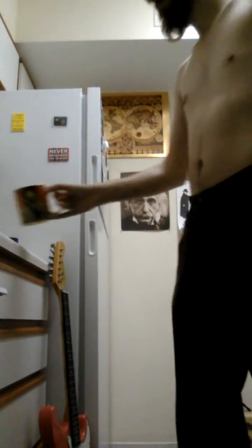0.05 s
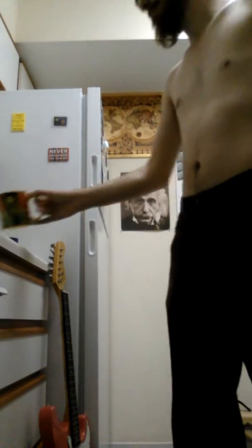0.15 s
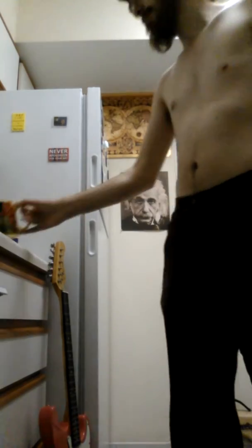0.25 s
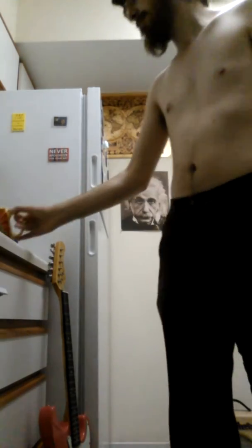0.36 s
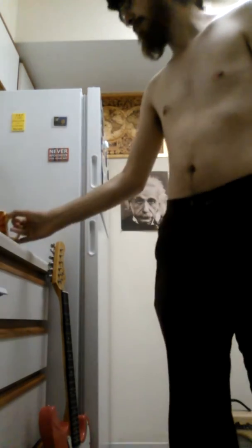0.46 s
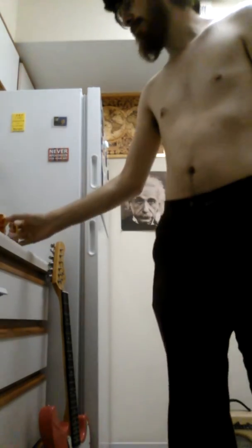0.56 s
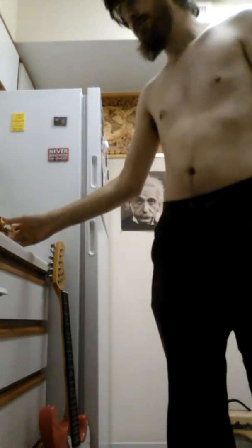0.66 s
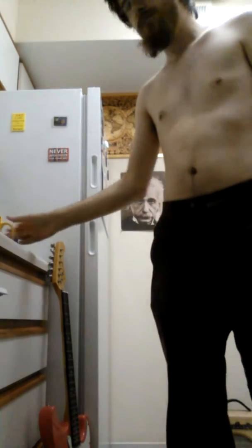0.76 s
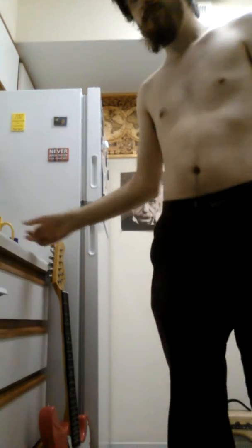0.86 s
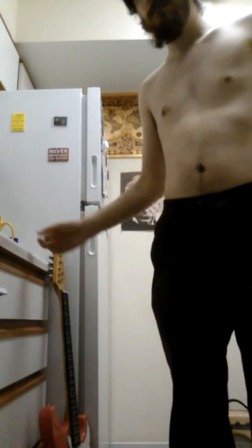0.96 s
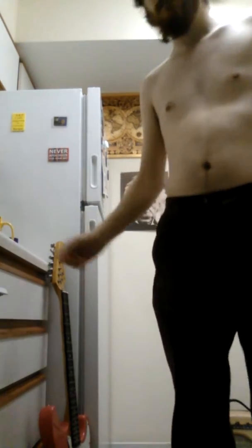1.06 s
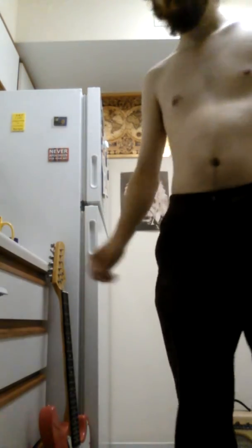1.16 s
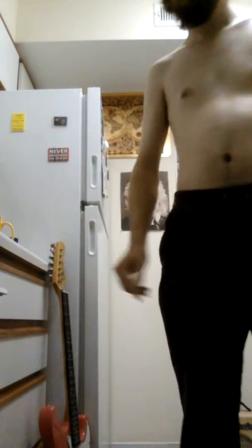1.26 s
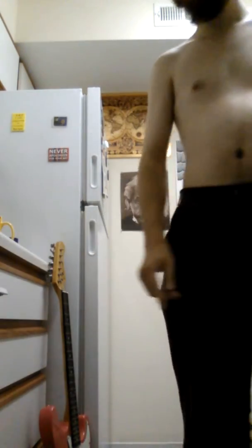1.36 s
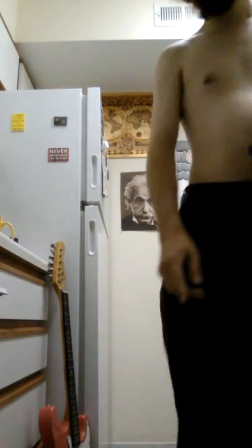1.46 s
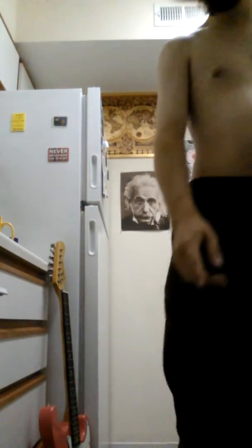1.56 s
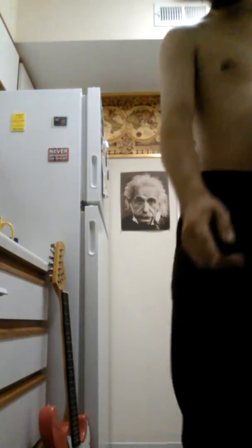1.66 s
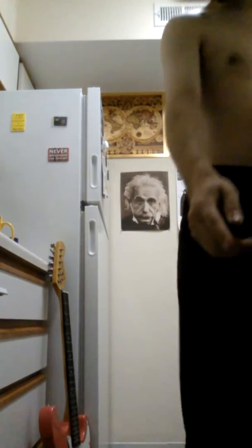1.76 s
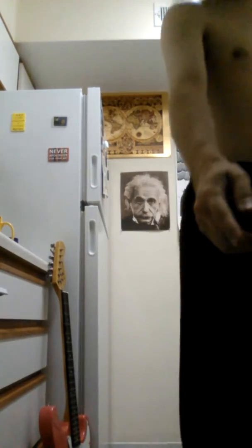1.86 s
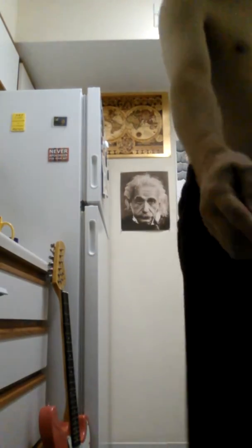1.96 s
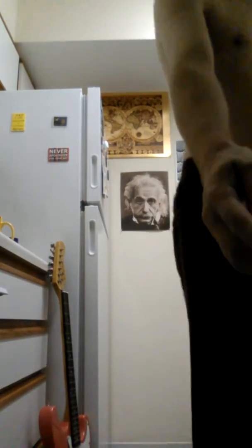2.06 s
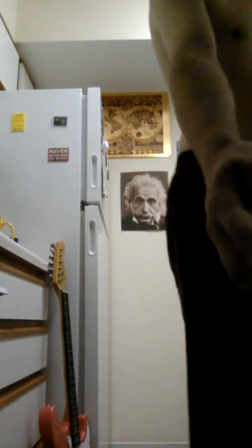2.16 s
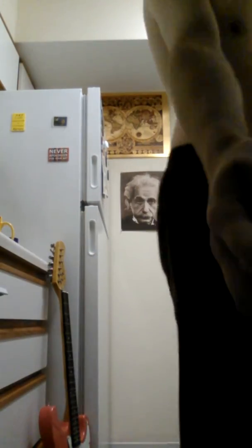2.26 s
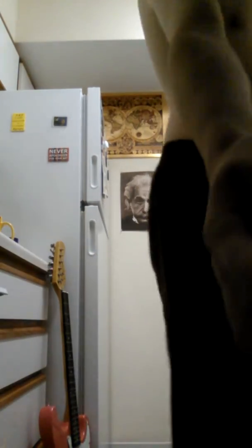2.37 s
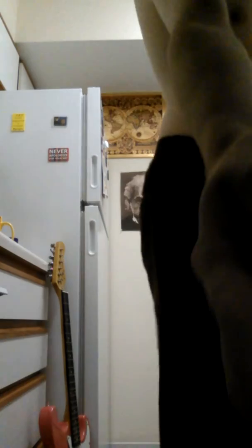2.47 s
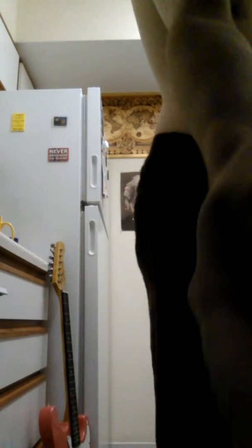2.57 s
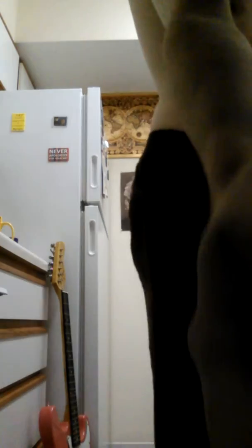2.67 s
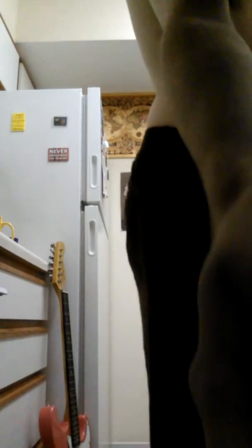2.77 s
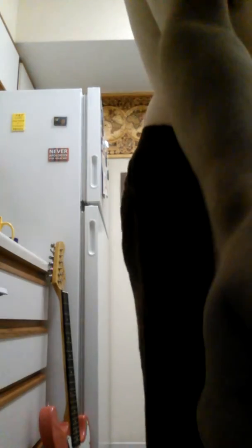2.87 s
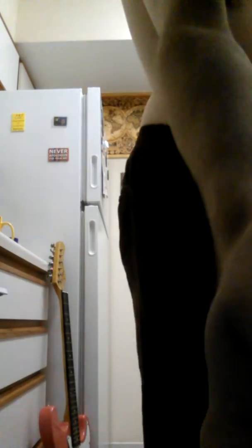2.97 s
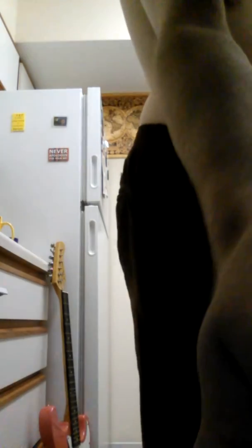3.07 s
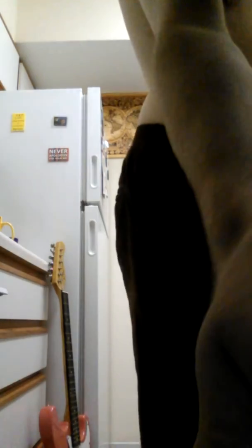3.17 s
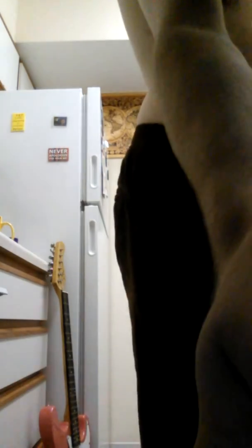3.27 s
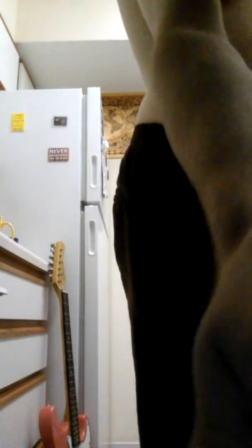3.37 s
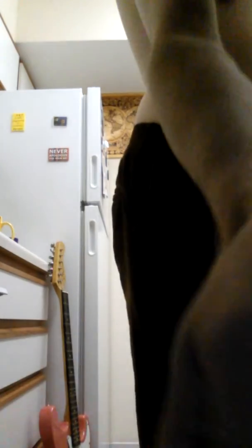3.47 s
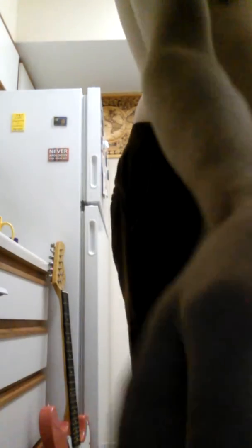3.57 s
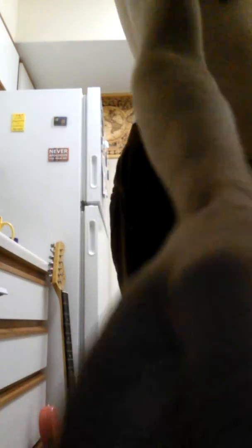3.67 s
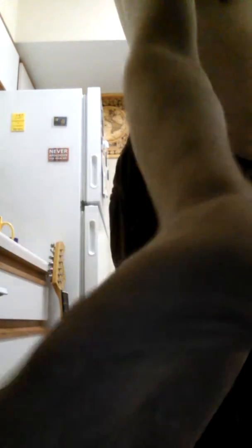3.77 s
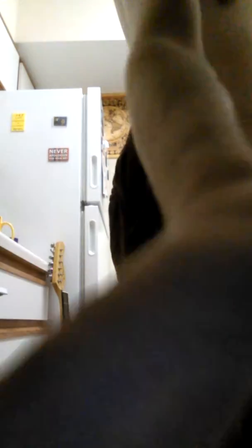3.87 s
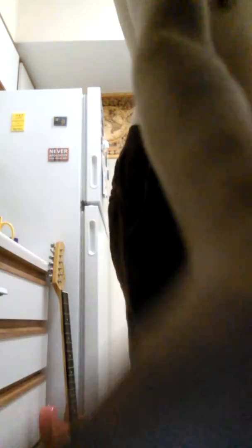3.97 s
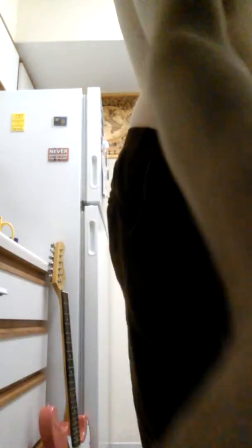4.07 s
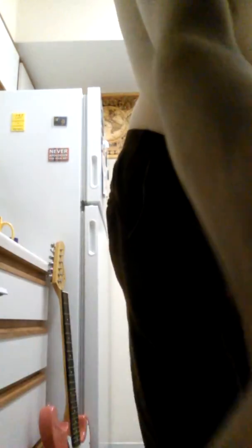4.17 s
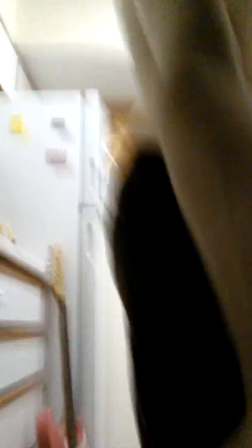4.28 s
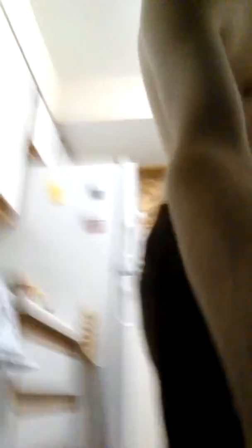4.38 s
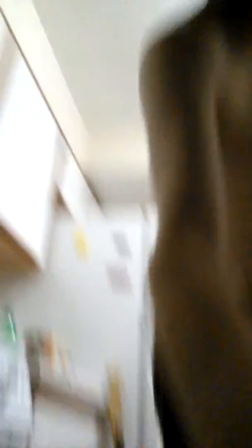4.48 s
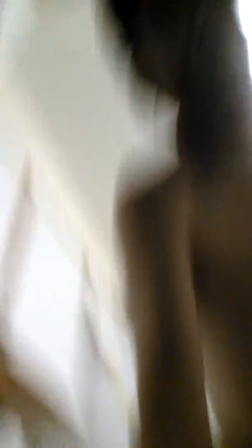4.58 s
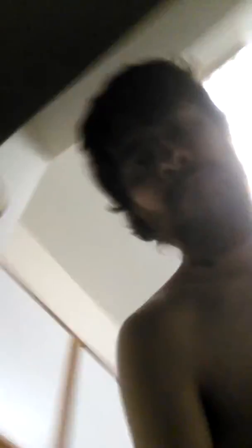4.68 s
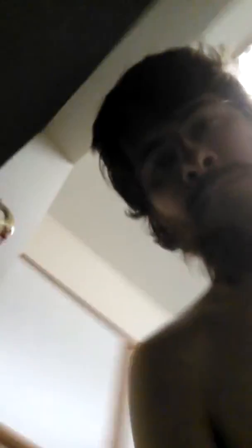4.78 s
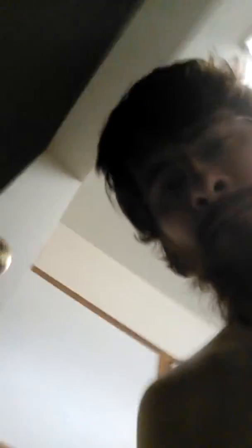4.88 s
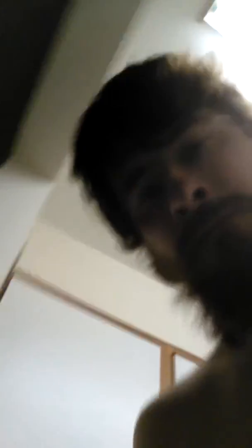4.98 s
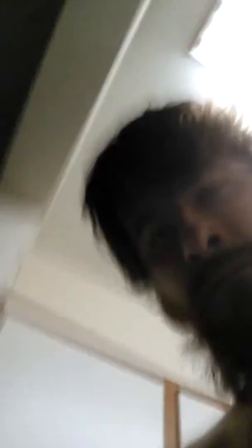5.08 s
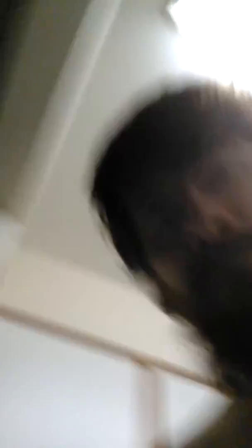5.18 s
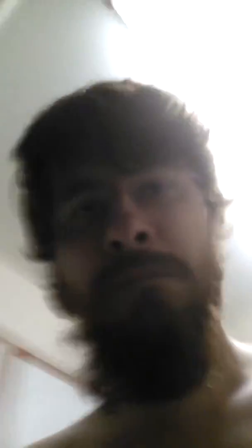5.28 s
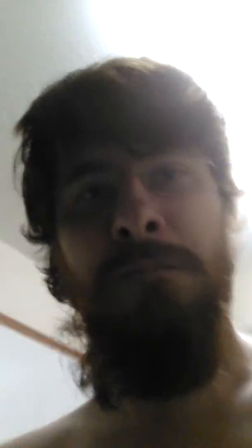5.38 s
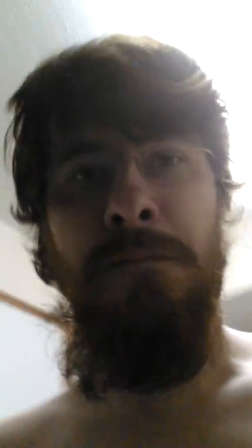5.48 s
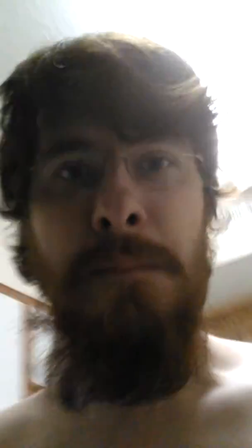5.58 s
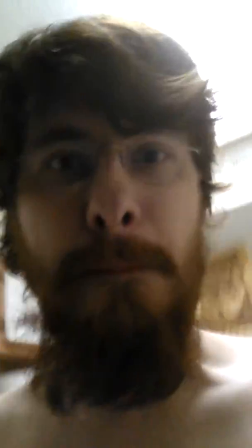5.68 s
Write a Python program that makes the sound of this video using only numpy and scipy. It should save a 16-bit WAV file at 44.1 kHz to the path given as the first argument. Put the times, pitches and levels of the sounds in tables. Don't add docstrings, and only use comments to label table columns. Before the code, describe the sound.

Double thud of a mug landing on a resonant counter, soft barefoot steps, faint fridge hum, then harsh close handling clatter on the phone.

```python
import sys
import numpy as np
from scipy import signal
from scipy.fft import rfft, irfft, next_fast_len
from scipy.io import wavfile
from scipy.ndimage import uniform_filter1d, map_coordinates

SR = 44100
rng = np.random.default_rng(int(sys.argv[2]) if len(sys.argv) > 2 else 0)


def output_pcm(signal):
    pcm = np.clip(np.atleast_2d(signal).T, -1, 1) * 32767
    wavfile.write(sys.argv[1], SR, np.round(pcm).astype(np.int16))


def convert_level_to_amplitude(level_db):
    exponent = np.asarray(level_db, float) / 20
    return 10 ** exponent


N = 253134

# (time [s], level [dB])
AIR_STIR = [(0.0, -56), (0.48, -59.5), (0.64, -50.5), (0.91, -52.5), (1.12, -61), (1.39, -60), (1.66, -55),
            (3.01, -63), (3.56, -58.5), (3.74, -64.5), (4.25, -66.5), (4.38, -65), (4.75, -54.5),
            (4.99, -50.5), (5.37, -65), (5.5, -54.5), (5.62, -57), (5.74, -54)]
# (frequency [Hz], density [dB/Hz])
RUMBLE_SPECTRUM = [(8, -11), (16, 0), (30, -11.5), (43, 2), (62, 0), (75, -23.5), (100, -30.5), (200, -76)]
# (frequency [Hz], density [dB/Hz])
HUM_SPECTRUM = [(47, -55.5), (80, -27.5), (113, -3), (187, -12), (217, -3.5), (278, -7.5), (322, -2.5),
                (361, -9), (500, -12), (845, -15.5), (947, -12.5), (1170, -18), (4000, -34.5),
                (5200, -64.5), (8800, -120)]
# (frequency [Hz], density [dB/Hz])
HISS_SPECTRUM = [(1760, -38.5), (3000, -24.5), (4070, -13.5), (6300, -10.5), (8000, -4.5), (9500, -4.5),
                 (12000, -10.5), (15750, -17), (15950, -50)]
# (frequency [Hz], level [dB], unsteadiness [1/s])
MOTOR_LINES = [(44, -48, 3.415), (103, -73.5, 27), (224, -60, 5), (340, -60, 8.3)]
# (frequency [Hz], level [dB])
WHINE_LINES = [(5152, -16), (8113, -16.5), (8166, -12.5), (8226, -0.5), (8285, -4.5)]
# (time [s], peel [dB], length [s], heel [dB], squeak [dB], brightness [dB/octave])
STEPS = [
    (0.143, -37, 0.021, -42.5, -60, 3),
    (0.967, -32, 0.017, -38, -39.5, -3),
    (1.444, -41.5, 0.031, -41, -67, -2),
    (1.529, -36, 0.036, -58, -71, 1.5),
]
# (frequency [Hz], density [dB/Hz])
PEEL_SPECTRUM = [(710, -54), (1200, -14.5), (1570, -13), (2230, -14), (2650, -8.5), (3180, -17),
                 (5470, -6.5), (8260, -0.5), (11600, -8), (15700, -24), (16000, -55)]
# (time [s], length [s], level [dB])
LIFTS = [
    (4.337, 0.035, -21),
    (4.628, 0.09, -27.5),
    (4.718, 0.07, -24),
    (4.785, 0.045, -27),
    (4.835, .07, -27),
    (4.91, .1, -28),
]
# (time [s], level [dB], t60 [s])
SQUEEZES = [
    (4.302, -5, 0.03),
    (4.343, -13.5, 0.23),
    (5.06, -35, 2.7),
    (5.36, -19, 0.1),
]
# (time [s], length [s], level [dB], frequency [Hz])
CREAKS = [(4.414, 0.026, -30.5, 3960), (4.715, 0.05, -57, 3640), (4.785, 0.025, -44, 3440),
          (4.836, .024, -35, 4900), (4.73, .04, -53, 4500), (4.795, .035, -51, 5500),
          (5.16, .035, -55, 5000), (3.125, .12, -64, 2200), (4.91, .14, -57, 2200),
          (4.855, .028, -48.5, 3860), (5.072, 0.031, -44, 4030), (5.118, 0.045, -40, 4114),
          (5.251, 0.026, -45.5, 4400), (5.226, .02, -52.5, 3500)]
# (time [s], length [s], level [dB], frequency [Hz])
SLIDES = [(4.189, 0.31, -54.5, 8910), (4.352, .02, -41, 8500), (4.368, 0.052, -28.5, 7920),
          (4.415, .033, -42, 6000), (4.445, 0.17, -54, 8900), (5.293, .085, -49, 8600),
          (5.341, 0.052, -36.5, 8370), (5.372, .02, -41, 8500), (5.39, 0.085, -49.5, 6100)]
# (time [s], length [s], level [dB], frequency [Hz])
SQUEAKS = [
    (3.13, 0.14, -59, 5650),
    (3.478, 0.022, -53, 5630),
    (5.415, .0334, -42.5, 6400),
    (5.462, 0.062, -34, 6230),
    (5.51, 0.045, -46.5, 6300),
    (5.638, 0.14, -45.5, 6860),
]
# (time [s], length [s], level [dB], frequency [Hz])
BRUSHES = [
    (3.118, 0.14, -63, 9060),
    (3.472, 0.028, -56, 9430),
    (4.888, 0.14, -55, 9700),
    (5.21, 0.034, -53, 9070),
    (5.24, 0.033, -56, 9500),
]
# (frequency [Hz], density [dB/Hz])
SKIN_SPECTRUM = [(1760, -43), (3000, -11), (4500, -11), (7000, -9), (10400, -7), (13000, -16), (15700, -15),
                 (16000, -45)]
# (frequency [Hz], density [dB/Hz])
CASE_SPECTRUM = [(300, -58), (700, 4.5), (1100, 3.5), (1600, 7.5), (2200, 1), (3000, -11.5), (5000, -49.5)]
# (time [s], level [dB], frequency [Hz])
KNOCKS = [(3.2347, -30, 1900), (4.2542, -27, 1190), (4.2585, -17, 1050), (4.2833, -21, 1080),
          (4.343, -8, 1400), (4.3561, -2, 1014), (4.3612, -5.5, 1080), (4.556, -29.5, 930),
          (4.7228, -16, 1350), (4.7348, -15, 1640), (4.7905, -7.5, 1430), (4.7968, -5, 1500),
          (4.83, -14, 1200), (4.832, -12.5, 1200), (4.8476, -7, 1700), (4.871, -13, 1432),
          (5.0718, -19.5, 905), (5.1405, -8, 1300), (5.1535, -10, 1220), (5.3344, -14, 1300),
          (5.411, -10, 1050), (4.7415, -24, 1500), (5.0955, -24, 1500), (5.1205, -17, 1500),
          (5.228, -27, 1300)]
# (time [s], knock [dB], crack [dB], length [s])
CRACKS = [(3.1183, -29.5, -28, 0.00055), (3.1225, -27, -26.5, 0.0025), (4.2915, -40, -27, 0.0004),
          (4.298, -20, -13, 0.0012), (4.301, -20, -24, .001), (4.3055, -4, -8, 0.00068),
          (4.312, -6, -3, 0.0024), (4.3295, -17, -13, 0.002), (4.3385, -22, -23, 0.001),
          (4.342, -20, -20, .001), (4.3235, -30, -22, .001), (4.3463, -1, -5, 0.0016),
          (4.36, -20, -15, .0008), (4.3667, -8, -0.5, 0.0017), (4.4045, -10, -9, 0.0011),
          (4.434, -29, -9, 0.0016), (4.8378, -44.5, -20, 0.002), (4.8415, -40, -21, .002),
          (4.723, -40, -33, .001), (4.869, -40, -30, .001), (5.076, -12.5, -8.5, 0.0018),
          (5.0843, -22, -11, .0012), (5.12, -30, -28, .0012), (5.1405, -30, -17, .001),
          (5.154, -40, -24, .0008), (5.335, -20, -24, .0015), (5.343, -40, -28, .0008),
          (5.697, -50, -42, .0008), (5.4175, -43, -29, 0.00091)]
# (time [s], knock [dB], knock [Hz], port [dB], length [s])
POPS = [(4.267, -23.5, 2420, -16.5, 0.0042), (4.3225, -17, 1900, -12, 0.002), (4.3912, -16, 1500, -9, .003),
        (4.4122, -0.5, 2266, 5, 0.0041), (4.4141, -1, 2150, 1, 0.0066), (5.13, -12, 1590, -6.5, .0011),
        (5.1351, -2, 1900, -2, 0.0029), (5.1445, -6, 1670, 3.5, .0018), (5.163, -24, 2400, -13, .001),
        (5.6418, -18, 850, -50, .0013), (5.5345, -13, 2600, -16, .0015), (4.7815, -30, 2200, -24, .001),
        (4.423, -14, 2000, -7, .0015), (4.428, -14, 1900, -9, .0015), (4.438, -18, 1800, -9, .002),
        (5.2654, 2.5, 2160, 7, 0.0017), (5.3688, 6.5, 1520, 0, 0.0015), (5.5342, -17, 1000, -17, 0.0015),
        (5.197, -20, 2200, -11, 0.0022), (4.7862, -16, 2200, -12, 0.002), (5.41, -20.5, 1750, -15, 0.00097)]
# (time [s], level [dB], frequency [Hz], t60 [s])
BUMPS = [(3.119, -33, 504, 0.076), (3.148, -40, 505, 0.12), (3.125, -40, 760, .05), (3.168, -37, 495, 0.15),
         (3.195, -41, 490, 0.12), (3.118, -38, 230, .08), (3.122, -42, 960, .04), (3.17, -51, 900, .15),
         (3.235, -36, 960, .02), (3.25, -46, 480, .1), (5.146, -19, 4150, .028), (5.371, -25, 4150, .025),
         (5.536, -37, 4150, .02), (4.418, -18, 4100, .025), (4.436, -22, 4150, .015), (5.075, -35, 90, .08),
         (5.145, -33, 75, .08), (5.333, -30, 250, .03), (5.533, -28, 420, .02), (4.783, -24, 800, .015),
         (4.39, -20, 800, .05), (4.412, -14, 1500, .025), (5.09, -34, 900, .06), (5.152, -26, 950, .04),
         (3.236, -29, 126, 0.07), (4.306, -15, 448, 0.031), (4.341, 7, 295, 0.0057), (4.348, 0, 495, 0.01),
         (4.357, -21, 331, .015), (4.361, -2.5, 202, 0.016), (4.362, -21, 59.6, 0.071),
         (5.266, -9.5, 973, 0.007), (5.369, -8, 700, 0.012), (5.371, -32, 294, 0.096)]
# (time [s], strength [dB], shudder [s], brightness [dB/octave], shudder [dB])
BLOWS = [
    (0.4397, -4.5, 0.067, -1.5, -10),
    (0.65, -1.5, 0.056, 1.5, -8),
]
# (frequency [Hz], level [dB], t60 [s])
COUNTER_MODES = [(88, -2.5, 0.37), (122.6, -5.5, .27), (162.1, -4.5, .2), (314, -7.5, .2), (380.4, -1, .22),
                 (432, 1, 0.2), (509, -2.5, .19), (630.4, -3.5, 0.18), (790, -8, 0.13), (939.5, -1.5, 0.21),
                 (1042, -1, .18), (1209, -2.5, 0.11), (1310, -4.5, .14), (1447, -2, .12), (1600, -10, .12),
                 (1750, -8, 0.11)]
# (frequency [Hz], density [dB/Hz])
THUD_SPECTRUM = [(35, -44.5), (60, -20), (108, -1), (212, -11), (448, -2), (767, -3), (1040, -3),
                 (1500, -4.5), (1900, -12), (2500, -22), (3340, -26.5), (8920, -36.5), (16000, -57)]
# (frequency [Hz], t60 [s])
KITCHEN_T60 = [(100, 0.62), (500, 0.33), (1500, 0.37), (4000, 0.37), (12000, 0.32)]
# (time [s], length [s], level [dB])
ROCKING = [
    (0.534, 0.036, -25),
    (0.562, 0.04, -22.5),
    (0.584, 0.061, -19),
    (0.65, 0.19, -42.5),
    (.7, 0.38, -56),
]
# (frequency [Hz], density [dB/Hz])
ROLL_SPECTRUM = [(100, -53.5), (220, -16), (310, 8.5), (380, -1.5), (480, -7.5), (900, -11.5),
                 (1500, -25.5), (2200, -31), (5000, -72)]
# (frequency [Hz], level [dB], t60 [s])
MUG_MODES = [(2914, -30, .42), (7360, -49.5, .33), (7790, -53, .3), (9092, -48.5, .45), (9679, -55, .39),
             (12580, -57, .19), (14010, -62, .2)]
# (time [s], level [dB], upper modes [dB])
LET_GO = [
    (0.497, -22, 24),
    (0.652, 5.5, -5),
    (0.708, 5.5, 2),
]

GRAB_S = 4.25
PORT_HZ, PORT_WIDTH_HZ = 4150, 190


def unit(x):
    return x / np.sqrt(np.mean(x ** 2) + 1e-20)


def along(points, hz):
    f, v = np.transpose(points)
    return np.interp(np.log(hz + 1), np.log(f + 1), v)


def curves(rows):
    s, *cols = np.transpose(rows)
    return [np.interp(np.arange(N) / SR, s, c) for c in cols]


def wobble(rate):
    return map_coordinates(rng.standard_normal(int(N * rate / SR) + 4), [np.arange(N) * rate / SR])


def filtered(x, response):
    m = next_fast_len(len(x) + 4096)
    return irfft(rfft(x, m) * response(np.fft.rfftfreq(m, 1 / SR)), m)[:len(x)]


def noise(spectrum, size=N):
    return unit(filtered(rng.standard_normal(size), lambda hz: convert_level_to_amplitude(along(spectrum, hz))))


def peak(hz, width_hz):
    return lambda f: 1j * f * width_hz / (hz * hz - f * f + 1j * f * width_hz)


def ring(hz, db, t60, t):
    return convert_level_to_amplitude(db - 60 * t / t60) * np.sin(2 * np.pi * hz * t)


def stroke(length_s, power):
    return np.sin(np.pi * np.linspace(0, 1, int(length_s * SR))) ** power


def top(x):
    return x / np.abs(x).max()


def add(track, s, x):
    part = track[round(s * SR):][:len(x)]
    part += x[:len(part)]


def echo(x):
    hz, t, z = signal.stft(rng.standard_normal(SR // 2), SR, nperseg=256)
    decay = convert_level_to_amplitude(-60 * t / along(KITCHEN_T60, hz)[:, None])
    tail = signal.istft(z * decay, SR, nperseg=256)[1]
    return signal.fftconvolve(x, tail / np.linalg.norm(tail))


def kitchen():
    still_db = -60
    rumble_db, rumble_grows = -43, 1
    hum_db, hum_grows = -49.5, 0.4
    whine_db, whine_grows, palm_db = -62.5, 1, -2.5
    hiss_db, = curves(AIR_STIR)
    stir_db = hiss_db - still_db
    t = np.arange(N) / SR
    bed = convert_level_to_amplitude(rumble_db + rumble_grows * stir_db - 7.5 + 0.7 * wobble(6)) * noise(RUMBLE_SPECTRUM)
    bed += convert_level_to_amplitude(hum_db + hum_grows * stir_db + 1.1 * wobble(7)) * noise(HUM_SPECTRUM)
    bed += convert_level_to_amplitude(hiss_db + 0.74 * wobble(11)) * noise(HISS_SPECTRUM)
    for hz, db, rate in MOTOR_LINES:
        bed += convert_level_to_amplitude(db + 2 + wobble(rate)) * np.sin(2 * np.pi * hz * t + wobble(rate))
    whine_level_db = whine_db + whine_grows * np.minimum(stir_db, 3) + palm_db * (t > GRAB_S)
    for hz, db in WHINE_LINES:
        tone = convert_level_to_amplitude(db + 1.5 * wobble(5)) * np.sin(2 * np.pi * hz * t + 2.2 * wobble(6))
        bed += convert_level_to_amplitude(whine_level_db + 1.5) * tone
    return bed


def feet():
    peel_rise = 7.7
    out, t = np.zeros(N), np.arange(6000) / SR
    for s, db, length, heel_db, squeak_db, tilt in STEPS:
        colour = [(f, g + tilt * np.log2(max(f, 4000) / 7000)) for f, g in PEEL_SPECTRUM]
        swell = (1 - np.exp(-t / (peel_rise * length ** 2))) * np.exp(-t / length)
        peel = convert_level_to_amplitude(db) * swell * noise(colour, size=6000)
        jitter = np.cumsum(rng.normal(0, .06, len(t)))
        squeak = convert_level_to_amplitude(squeak_db - 60 * t / .16) * np.sin(2 * np.pi * (2760 * t - 1000 * t * t) + jitter)
        add(out, s, peel + squeak + ring(187.6, heel_db, 0.28, t))
        add(out, s + .003, convert_level_to_amplitude(-0.5) * echo(peel))
    return out


def hand():
    tremor_db, settle_db_per_s, grip_db = -35, 8.5, -47.5
    t = np.arange(N) / SR
    held = np.clip((t - GRAB_S) / 0.017, 0, 1)
    swing = convert_level_to_amplitude(tremor_db - settle_db_per_s * (t - GRAB_S)) * held
    press = convert_level_to_amplitude(grip_db) * held
    for s, length, db in LIFTS:
        add(swing, s, convert_level_to_amplitude(db) * stroke(length, power=0.42))
    for s, db, t60 in SQUEEZES:
        add(press, s, convert_level_to_amplitude(db - 60 * t / t60) * (1 - np.exp(-t / 0.0023)))
    sway = swing * noise([(3, 4), (10, -14), (25, 7), (48, 2), (90, -10), (200, -21), (600, -79)])
    grip = press * convert_level_to_amplitude(-5.5) * noise([(80, -52), (170, -2.5), (300, 2.5), (500, -3.5), (900, -43), (2000, -69)])
    return sway + grip


def friction(length_s, hz, wide_db, body_db):
    count = int(length_s * SR)
    swell = stroke(length_s, power=0.6) * np.linspace(1, 0, count) ** 0.4
    grains = unit(uniform_filter1d(rng.standard_normal(count), size=40))

    def band(centre_hz):
        narrow = filtered(rng.standard_normal(count), peak(centre_hz, 600))
        return unit(filtered(narrow, peak(centre_hz, 1200)))

    rub = band(hz)
    if 5e3 < hz < 6.6e3:
        rub += convert_level_to_amplitude(-5) * (band(1.73 * hz) + .45 * band(1.62 * hz) + .35 * band(2.25 * hz))
    rub += convert_level_to_amplitude(wide_db) * noise(SKIN_SPECTRUM, size=count)
    rub += convert_level_to_amplitude(body_db) * noise(CASE_SPECTRUM, size=count)
    return convert_level_to_amplitude(3 * grains + 0.3) * swell * rub


def fingers():
    out = np.zeros(N)
    # (rows, wide hiss dB, body dB) over the squeak
    kinds = [(CREAKS, -9, 12), (SLIDES, 6, 7), (SQUEAKS, -5, -6), (BRUSHES, 8, 1)]
    for rows, wide_db, body_db in kinds:
        for s, length, db, hz in rows:
            add(out, s, convert_level_to_amplitude(db) * friction(length, hz, wide_db, body_db))
    return out


def contacts():
    knocks = [(s, db, hz, db - 17, db - 23, .0013) for s, db, hz in KNOCKS]
    cracks = [(s, db, 1154, 1.93 * crack_db + 1.5, crack_db, length) for s, db, crack_db, length in CRACKS]
    pops = [(s, db, hz, port_db, port_db - 13.5, length) for s, db, hz, port_db, length in POPS]
    return knocks + cracks + pops


def snaps():
    out, t = np.zeros(N), np.arange(2500) / SR
    soft = 1 - np.exp(-t / 0.00019)
    for s, db, hz, port_db, crack_db, length in contacts():
        burst = np.exp(-(t / length) ** 2) * (1 - np.exp(-t / 0.000086))
        slips = rng.standard_normal(len(t)) * burst
        rattle = top(filtered(slips, lambda f: peak(hz, 1300)(f) ** 3))
        knock = soft * ring(hz, 0, 0.0052 + 2.9 * length, t) + 0.75 * rattle
        wide = filtered(filtered(slips, peak(PORT_HZ, 2200)), peak(PORT_HZ, 2300))
        port = top(wide) + 0.3 * top(filtered(wide, peak(PORT_HZ, PORT_WIDTH_HZ)))
        crack = filtered(slips, lambda f: peak(7500, 9000)(f) ** 2
                         / (1 - (f / 11500) ** 2 + 0.8j * f / 11500) ** 2)
        add(out, s, convert_level_to_amplitude(db - 5.0) * top(knock))
        add(out, s, convert_level_to_amplitude(port_db - 7.5) * top(port))
        add(out, s, convert_level_to_amplitude(crack_db + 0.94) * top(crack))
    t = np.arange(SR // 4) / SR
    for s, db, hz, t60 in BUMPS:
        add(out, s, (1 - np.exp(-t * hz)) * ring(hz, db + 6.5, t60, t))
    return out


def blows():
    out, t = np.zeros(N), np.arange(SR // 2) / SR
    for s, db, shudder_s, tilt, shudder_db in BLOWS:
        slope = lambda hz: tilt * np.log2(np.clip(hz, 60, 4000) / 700)
        colour = [(f, g + slope(f)) for f, g in THUD_SPECTRUM]
        board = np.zeros(len(t))
        for hz, level_db, t60 in COUNTER_MODES:
            swing = 1 - np.exp(-t * hz / 0.54)
            board += swing * ring(hz, level_db + slope(hz) + rng.normal(0, 1.5), t60, t)
        fading = np.exp(-(t / shudder_s) ** 3) * (1 - np.exp(-t / 0.0043))
        click = filtered(np.arange(2048) == 1024, lambda hz: convert_level_to_amplitude(along(colour, hz)) * (hz > 70))
        room = echo(click / np.linalg.norm(click))[1024:][:len(t)]
        add(out, s, convert_level_to_amplitude(db - 9.5) * board)
        add(out, s, convert_level_to_amplitude(shudder_db) * fading * noise(colour, size=len(t)))
        add(out, s, convert_level_to_amplitude(db + 24.5) * room * (1 - np.exp(-t / 0.00098)))
    return out


def rocking():
    out = np.zeros(N)
    for s, length, db in ROCKING:
        swell = stroke(length, power=0.53)
        roll = convert_level_to_amplitude(db) * swell * noise(ROLL_SPECTRUM, size=len(swell))
        add(out, s, roll)
        add(out, s + 0.0033, convert_level_to_amplitude(-2.5) * echo(roll))
    return out


def mug():
    out, t = blows() + rocking(), np.arange(SR // 2) / SR
    for s, db, upper_db in LET_GO:
        tones = np.zeros(len(t))
        for hz, level_db, t60 in MUG_MODES:
            mode_db = level_db + upper_db * (hz > 9500) - 60 * t / t60
            tones += convert_level_to_amplitude(mode_db) * np.sin(2 * np.pi * hz * (t + s))
        add(out, s, convert_level_to_amplitude(db) * (1 - np.exp(-t / 0.015)) * tones)
    return out


def scene():
    return (kitchen() + feet() + hand() + fingers() + snaps() + mug())[None]


def top_cut(x):
    return signal.sosfilt(signal.butter(12, 16480, fs=SR, output="sos"), x)


def record(dry):
    x = dry / (1 + np.abs(dry / .97) ** 10) ** (1 / 10)
    x = filtered(x[0], lambda hz: (hz < 16450) / (1 + (hz / 16150) ** 30))[None]
    return top_cut(x)


dry = scene()
out = record(dry)
output_pcm(out)
```